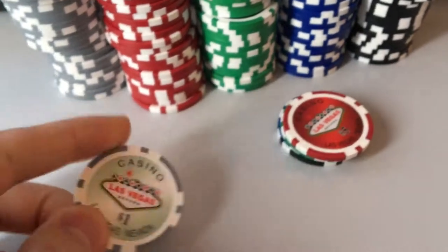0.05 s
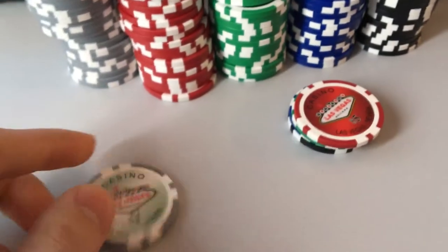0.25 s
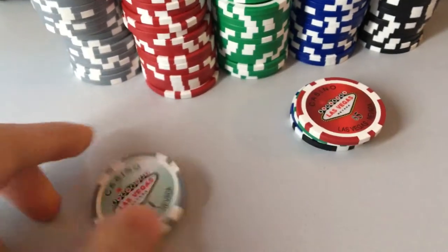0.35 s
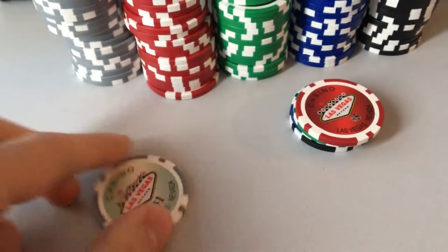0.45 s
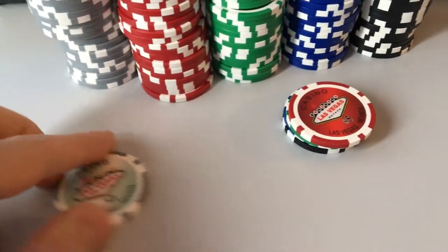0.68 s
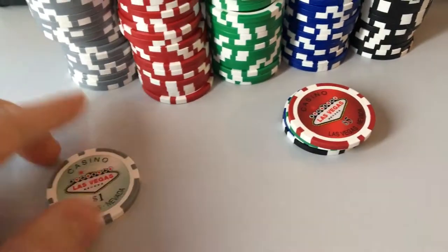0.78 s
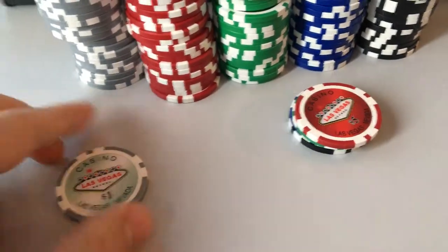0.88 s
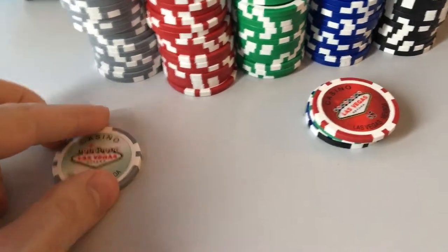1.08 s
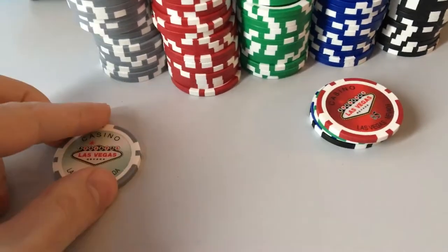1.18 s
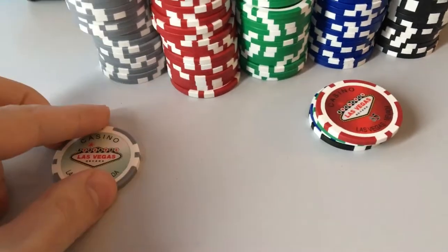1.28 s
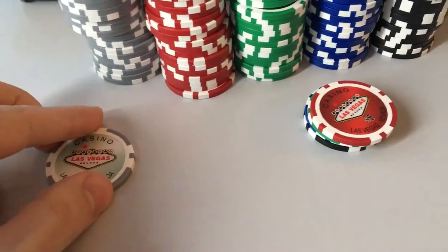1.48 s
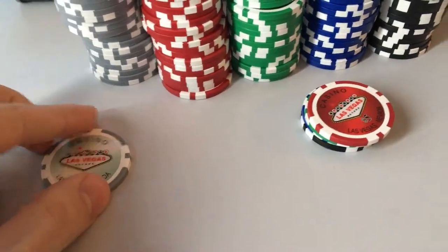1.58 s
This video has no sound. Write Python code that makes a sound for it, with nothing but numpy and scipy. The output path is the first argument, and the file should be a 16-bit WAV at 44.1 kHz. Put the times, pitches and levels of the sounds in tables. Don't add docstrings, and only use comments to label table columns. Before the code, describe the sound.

A hard clay chip meets a table, heard close in a quiet, softly reverberant room. After faint room noise it clicks down at 0.25 s with small bounces, skips in a dense buzz of clicks at 0.34, clatters brightly around 0.4, and rocks on its rim until 0.57. Dry sliding rustles follow from 0.6 to 0.85, then a weaker scrape at 1.03-1.2, leaving low hum.

```python
import sys
import numpy as np
from scipy import signal
from scipy.fft import rfft, irfft
from scipy.io import wavfile

SR = 44100
rng = np.random.default_rng(int(sys.argv[2]) if len(sys.argv) > 2 else 0)


def gain_from_decibels(decibels):
    exponent = np.asarray(decibels, float) / 20
    return 10 ** exponent


def dump_mix(stems):
    frames = np.atleast_2d(stems).T
    limited = np.clip(frames, -1, 1)
    pcm = np.round(limited * 32767).astype(np.int16)
    wavfile.write(sys.argv[1], SR, pcm)


N = 72765


def rms_one(x):
    return x / np.sqrt(np.mean(x ** 2) + 1e-20)


def in_time(rows, axis=1):
    time_s, level_db = np.transpose(rows)[[0, axis]]
    return gain_from_decibels(np.interp(np.arange(N) / SR, time_s, level_db, left=-120, right=-120))


def ring(clicks, hz, t60):
    radius = gain_from_decibels(-60 / (t60 * SR))
    angle = 2 * np.pi * hz / SR
    feedback = [1, -2 * radius * np.cos(angle), radius * radius]
    return signal.lfilter([0, np.sin(angle)], feedback, clicks + 1e-18)


def coloured(x, spectrum):
    hz, level_db = np.transpose(spectrum)
    f = np.arange(N // 2 + 1) * SR / N + 1
    gain = gain_from_decibels(np.interp(np.log(f), np.log(hz), level_db))
    return rms_one(irfft(rfft(x) * gain, N))


def grains(per_s):
    spread_db = 3.0
    size = gain_from_decibels(spread_db * np.minimum(rng.exponential(1, N), 4)) * rng.choice([-1, 1], N)
    return rms_one(size * (rng.random(N) < per_s / SR))


def rubbed(clicks, modes):
    return rms_one(sum(gain_from_decibels(level_db) * ring(clicks, hz, t60) for hz, level_db, t60 in modes))


def click_train(start_s, level_db):
    clicks = np.zeros(N)
    clicks[(start_s * SR).astype(int)] = gain_from_decibels(level_db)
    return clicks


def strike(start_s, level_db, modes):
    spread_db = 3
    out = np.zeros(N)
    luck = rng.standard_normal((len(start_s), len(modes)))
    for k, (hz, mode_db, t60) in enumerate(modes):
        clicks = click_train(start_s, level_db + mode_db + spread_db * luck[:, k])
        out += ring(clicks * (-1) ** k, hz, t60)
    return out


# pitch_hz [Hz], level_db [dB]
AIR = [(15, -44), (32, -17.5), (55, -1.5), (140, -15), (300, -14), (450, -27), (1300, -23.5), (2500, -38.5),
       (16000, -47)]
# pitch_hz [Hz], width_hz [Hz], level_db [dB]
HUM = [(48, 12, -60), (215, 31, -71), (710, 25, -77.5), (770, 140, -71)]


def air():
    tones = np.zeros(N)
    for hz, width_hz, level_db in HUM:
        tones += gain_from_decibels(level_db) * rms_one(ring(rng.standard_normal(N), hz, 2.2 / width_hz))
    return gain_from_decibels(-60.5) * coloured(rng.standard_normal(N), AIR) + tones


def crack(start_s, ring_db):
    decay_s, band_hz = 0.00049, [2000, 6670]
    clicks = click_train(start_s, ring_db - 4.5)
    envelope = signal.lfilter([1], [1, -np.exp(-1 / (decay_s * SR))], clicks)
    band = signal.butter(2, band_hz, "band", fs=SR, output="sos")
    return signal.sosfilt(band, envelope * rng.standard_normal(N))


# pitch_hz [Hz], level_db [dB], t60_s [s]
TABLE = [(255, -26.5, 0.093), (351, -29.5, 0.045), (504, -18.5, 0.084), (628, -32, 0.022),
         (824, -7.5, 0.052), (930, -15, 0.028), (1171, -8, 0.034), (1502, -9, 0.031), (1803, -6, .025),
         (2164, -10.5, 0.022), (2440, -9.5, 0.032), (2750, -17, .012), (3080, -8, 0.0098),
         (4300, -13, .012)]


def contacts(rows, chip):
    echo_s, echo_db = .0031, -1.5
    start_s, ring_db, knock_db = np.transpose(rows)
    knock = strike(start_s, knock_db, TABLE)
    echo = gain_from_decibels(echo_db) * np.roll(knock, int(echo_s * SR))
    return strike(start_s, ring_db, chip) + crack(start_s, ring_db) + knock + echo


# start_s [s], ring_db (chip) [dB], knock_db (table) [dB]
LANDING = [(.2466, -18.5, -16.5), (.2662, -27, -22), (.2772, -30.5, -22.5), (.2857, -29, -29.5),
           (.298, -38, -38.5), (.3175, -49, -39), (.3812, -12, -28), (.3941, -11, -24.5), (.401, -15, -28),
           (.4038, -13, -23.5), (.4081, -8, -25), (.4122, -13.5, -19), (.4167, -9, -29.5), (.422, -14, -22)]
# start_s [s], ring_db (chip) [dB], knock_db (table) [dB]
ROCKING = [(.46, -32.5, -33.5), (.4645, -28, -38.5), (.4737, -23, -31.5), (.479, -23, -30),
           (.488, -26, -29), (0.4918, -24.5, -39.5), (0.4933, -29, -36.5), (.501, -20.5, -27.5),
           (0.5123, -16, -30), (0.5184, -28, -36.5), (0.5274, -27, -35.5), (0.537, -25, -27),
           (.541, -12, -26.5), (0.5453, -9.5, -27), (0.5478, -8.5, -24), (.55, -14, -26.5),
           (.566, -34, -29.5), (0.5694, -12, -29), (0.572, -19, -25.5)]
# pitch_hz [Hz], level_db [dB], t60_s [s]
CHIP = [(3360, -23, .006), (3910, -16, .006), (4433, -17, 0.017), (5350, -8.5, 0.005), (5950, -14.5, .006),
        (6520, -17, .012), (6590, -3, 0.017), (8700, -28.5, .008), (9710, -19.5, .017), (11100, -21, .006),
        (12400, -26, .006), (14900, -29.5, .005), (15400, -28.5, .012)]


def landing_and_rocking():
    return contacts(LANDING + ROCKING, CHIP)


# time_s [s], table_db [dB], chip_db [dB]
CHATTER = [(.25, -42.5, -64.5), (.3, -44, -61), (.36, -44.5, -51.5), (.39, -45.5, -56), (.42, -35.5, -41),
           (.45, -42.5, -44.5), (.5, -36.5, -37), (.53, -44, -50), (.59, -43, -54.5)]
# pitch_hz [Hz], level_db [dB], t60_s [s]
HELD = [(4400, -15, .005), (5300, -9, 0.0089), (5680, -7.5, .006), (6100, -10, 0.0069),
        (6695, -11.5, 0.013), (9800, -19.5, .007), (12000, -27, 0.0035), (15100, -27, 0.0046)]


def chatter():
    touch = grains(per_s=1100)
    table = in_time(CHATTER) * rubbed(touch, TABLE)
    chip = in_time(CHATTER, axis=2) * rubbed(touch, HELD)
    return table + chip


# start_s [s], level_db [dB]
THUDS = [
    (.255, -48),
    (.285, -46.5),
    (.41, -50.5),
    (.56, -50.5),
]
# pitch_hz [Hz], level_db [dB], t60_s [s]
FRAME = [(52, -3.5, .25), (100.7, 0.5, .2), (161, -5, .12)]


def thuds():
    start_s, level_db = np.transpose(THUDS)
    return strike(start_s, level_db, FRAME)


# start_s [s], ring_db
# (chip) [dB], knock_db (table) [dB]
SKIPPING = [(.329, -35.5, -36.5), (.331, -25.5, -31), (.3335, -14.5, -28), (.336, -12.5, -23),
            (.3371, -12, -25), (.338, -10, -25), (.3395, -9, -20.5), (.3407, -13, -24), (.3413, -11, -26),
            (.3427, -15, -24), (.3443, -14, -26), (.347, -28.5, -29.5), (.5462, -13, -33),
            (.5486, -14.5, -29.5), (.5725, -19.5, -34)]


def skipping():
    return contacts(SKIPPING, HELD)


# time_s [s], level_db [dB]
SLIDE_A = [(0.6, -44.5), (0.63, -57.5), (0.674, -60), (0.704, -52.5), (0.814, -52.5), (0.85, -69.5),
           (1.0, -73)]
# time_s [s], level_db [dB]
SLIDE_B = [(1.0, -70), (1.01, -85), (1.03, -46.5), (1.078, -61.5), (1.118, -55.5), (1.126, -66.5),
           (1.174, -57), (1.248, -78.5), (1.3, -76)]
# pitch_hz [Hz], level_db [dB]
RUB = [(200, -16.5), (400, -20), (800, -10), (1500, -4), (2400, -4.5), (3500, -13), (6600, -20),
       (16000, -27)]
# pitch_hz [Hz], level_db [dB], t60_s [s]
PRESSED = [(830, -11, 0.039), (1230, -5, 0.033), (1585, -1, .045), (2356, -2, 0.023), (2660, -5, 0.033),
           (3102, -9, 0.017), (3800, -13, .01), (6640, -17.5, .03)]


def slide():
    rub = grains(per_s=7000)
    friction = rms_one(coloured(rub, RUB) + gain_from_decibels(-4.5) * rubbed(rub, PRESSED))
    return (in_time(SLIDE_A) + in_time(SLIDE_B)) * friction


# time_s [s], level_db [dB]
BRUSH = [(.6, -64), (.7, -62), (.85, -66.5), (.95, -68), (.96, -79), (1.02, -69), (1.2, -85)]
# pitch_hz [Hz], level_db [dB per Hz]
SKIN = [(800, -24), (3000, -3), (7000, -1), (7900, 1.5), (9000, -5.5), (16000, -9.5)]


def skin():
    return in_time(BRUSH) * coloured(rng.standard_normal(N), SKIN)


def room(x):
    t60_s, wall_cut_hz = 0.32, 3300
    out = np.zeros(N)
    dull = np.exp(-2 * np.pi * wall_cut_hz / SR)
    lags = (rng.uniform(.006, 0.027, 10) * SR).astype(int)
    for k, lag in enumerate(lags):
        loop, state = x.copy(), [0.]
        gain = gain_from_decibels(-60 * lag / SR / t60_s)
        for i in range(lag, N, lag):
            back, state = signal.lfilter([gain * (1 - dull)], [1, -dull], loop[i - lag:i], zi=state)
            loop[i:i + lag] += back[:N - i]
        out += (loop - x) * (-1) ** k
    return out


# pitch_hz [Hz], width_hz [Hz], share removed [0-1]
DIPS = [(7570, 890, 0.56), (7950, 880, 0.7), (13790, 1100, 0.61)]


def near_colour(x):
    low_cut = signal.butter(2, 220, "high", fs=SR, output="sos")
    x = signal.sosfilt(low_cut, x)
    for hz, width_hz, share in DIPS:
        x = x - share * signal.lfilter(*signal.iirpeak(hz, hz / width_hz, fs=SR), x)
    return x


def scene():
    near = near_colour(landing_and_rocking() + chatter() + skipping() + slide() + skin())
    return (near + gain_from_decibels(-19.5) * room(near) + thuds() + air())[None]


def band_limit(x):
    return signal.sosfilt(signal.butter(12, 17000, fs=SR, output="sos"), x)


def record(dry):
    top_cut = signal.cheby2(10, 40, 16600, fs=SR, output="sos")
    return band_limit(signal.sosfilt(top_cut, dry))


dry = scene()
out = record(dry)
dump_mix(out)
```